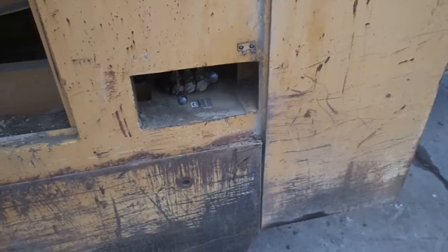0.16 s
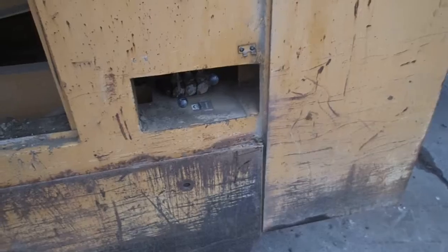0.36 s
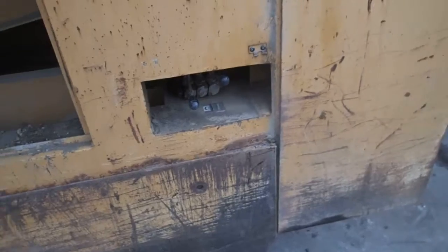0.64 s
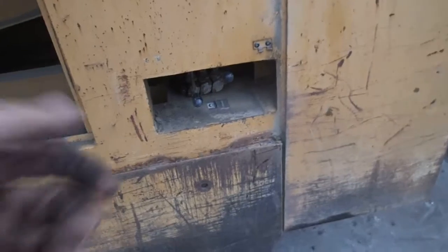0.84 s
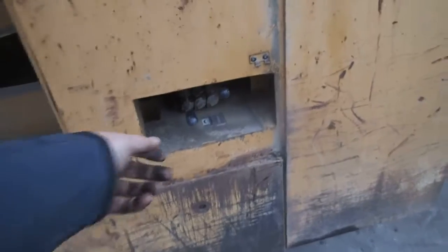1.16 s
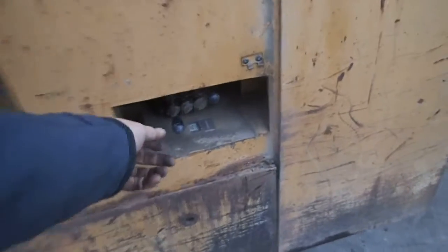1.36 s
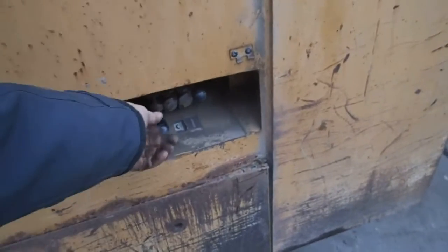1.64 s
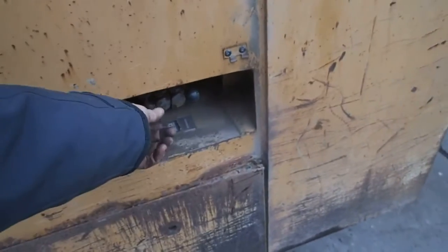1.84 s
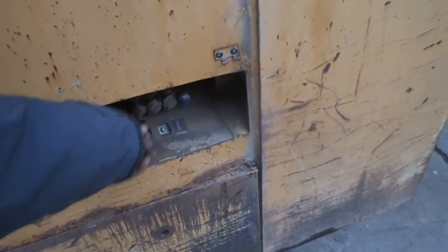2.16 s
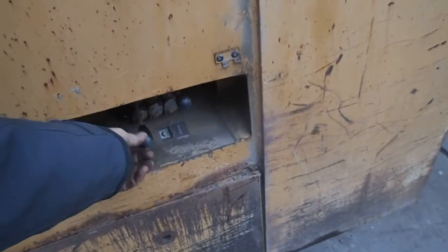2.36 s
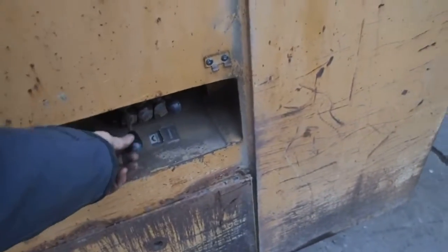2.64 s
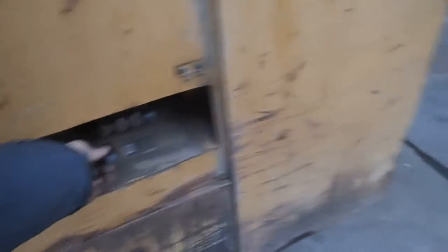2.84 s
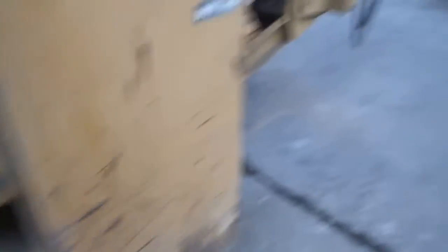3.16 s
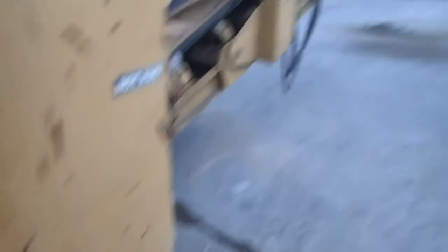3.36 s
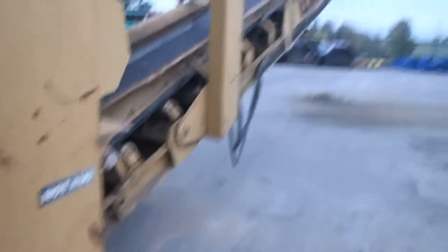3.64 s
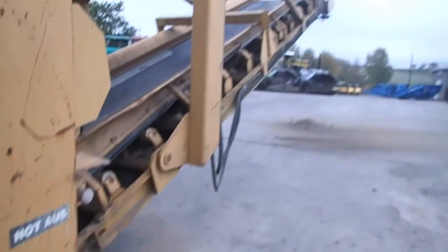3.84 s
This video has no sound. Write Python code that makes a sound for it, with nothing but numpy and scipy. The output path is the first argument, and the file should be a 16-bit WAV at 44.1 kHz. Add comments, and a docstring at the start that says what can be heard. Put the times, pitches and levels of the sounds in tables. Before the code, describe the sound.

A screening machine in an outdoor yard, heard close to its steel side panels. After a short silence and a switch-on pop, engine roar, low drone and rapid pulsing metal rattle run steadily to the end.

```python
"""A shaker shaft turns about 14 times a second in a screening plant, heard beside its steel side panels.
It drives a drone of shaft-rate multiples in the frame and throws loose metal into a bright rattle each turn.
Under it the engine roars as shaped noise and whines on steady tones; panels rumble, throb and clatter.
Random contacts ring the metal; harder knocks, clanks and one squeak stand out at set moments.
The microphone switches on with a pop after a quarter second of silence, right side first."""
import sys
import numpy as np
from scipy import signal
from scipy.fft import rfft, irfft
from scipy.io import wavfile
from scipy.ndimage import uniform_filter1d

SR = 44100
rng = np.random.default_rng(int(sys.argv[2]) if len(sys.argv) > 2 else 0)


def store_wav(level_fs):
    """Save 16-bit WAV to argv[1]."""
    pcm = np.round(np.clip(np.atleast_2d(level_fs), -1, 1) * 32767)
    wavfile.write(sys.argv[1], SR, pcm.T.astype(np.int16))


N = 176400
TIME = np.arange(N) / SR  # seconds
BINS = np.maximum(np.arange(N // 2 + 1) * SR / N, 1)  # Hz

# Microphone: switch-on, steep top cut, and the pop as the right side opens first
START_S, CUTOFF_HZ = 0.265, 15700
POP_LEAD_S, POP_HZ, POP_T60_S = 0.0063, 350, 0.024
POP_DRIVE, POP_TOP = 1.4, 0.79  # push into the flattening, and the height where it flattens
POP_CRACKLE = 0.18  # bright noise added to the pop's sine
# Dips in the microphone's response: pitch_hz, half_width_hz, depth_db
MIC_DIPS = [(1880, 43, 12), (2603, 180, 4.5), (3455, 143, 9), (3950, 110, 5), (4230, 75, 2.5),
            (4803, 47, 14.5)]
# Difference signal against the common signal in the stereo noise: pitch_hz, level_db
STEREO_WIDTH = [(25, -12), (50, -15), (75, -12), (150, -24), (300, -20), (600, -20.5), (1200, -18.5),
                (2100, -24.5), (2700, -26), (3800, -18), (5200, -9), (6500, -8), (8000, -4.5), (10000, -2),
                (13000, 0.5)]
# Balance of the whole machine: pitch_hz, left_minus_right_db
LEFT_RIGHT_BALANCE = [(30, -1), (60, 3), (92, 1.5), (140, 2.5), (210, 2.0), (330, 2.5), (500, 2.0),
                      (770, 1), (1170, 1), (1790, 1), (2740, -1), (4190, 3.5), (6410, -0.5), (9810, 1),
                      (15000, 1.5)]

# Frame drone: multiples of the shaft rate [orders], and the relative level of each [level_db]
SHAFT_HZ, SHAFT_WANDER_S, DRONE_WAVER_DB = 13.82, 0.0004, 2
DRONE_ORDERS = [3, 4, 5, 6, 7, 8, 9, 10, 11, 12, 13, 15, 17, 18, 19, 20, 21, 27, 31, 33, 39]
DRONE_ORDER_LEVELS = [-53.5, -64, -42, -46, -35, -34.5, -54, -35.5, -43, -43.5, -44.5, -37, -44, -36, -35,
                      -39, -42.5, -40, -42.5, -45.5, -51]
# Swell of the whole drone: time_s, relative level_db
DRONE_SWELL = [(.26, -2.5), (1, 2), (2, -1.5), (3, 0), (4, -2.5)]

# Steady engine and fan tones: pitch_hz, level_db
ENGINE_TONES = [(107, -41), (114, -39.5), (124, -39.5), (175.6, -44.5), (296.3, -36.5), (356.7, -48),
                (416.3, -35.5), (538.6, -47), (677, -45.5), (685.4, -40.5), (1720, -57)]
TONES_WAVER_DB, ENGINE_WANDER_S = 2.5, 0.00053
# Engine roar over time: time_s, level_db
ROAR_SWELL = [(.26, -21), (.55, -20.5), (1, -25), (1.6, -21.5), (2.2, -21.5), (2.8, -22), (3.3, -22),
              (4, -23)]
# Colour of the roar: pitch_hz, relative level_db per Hz
ROAR_SPECTRUM = [(20, -22), (35, -17), (55, -12.5), (75, -7), (100, -5), (135, -3), (170, 0), (260, -3.5),
                 (400, -2.5), (520, -6.5), (800, -8.5), (1600, -16), (2600, -24), (4000, -29), (5200, -18),
                 (8000, -38), (11000, -47), (16000, -48)]
WHINE_HZ, WHINE_WIDTH_HZ = 1220, 5.8
# Thin whine over time: time_s, level_db
WHINE_SWELL = [(.26, -50), (1.8, -43), (2.7, -37), (3.3, -35), (3.8, -50)]

RUMBLE_HZ, RUMBLE_WIDTH_HZ, BOOM_HZ, BOOM_WIDTH_HZ = 115, 45, 259, 44
# Low rumble of the housing: time_s, level_db
RUMBLE_SWELL = [(.26, -24), (.5, -37), (.62, -26), (.85, -31.5), (1.2, -39), (1.6, -36), (1.7, -27),
                (2.04, -33), (2.17, -45), (2.27, -30), (2.47, -39), (2.63, -28), (3.1, -38), (3.48, -27),
                (3.62, -44), (3.72, -27), (4, -36)]
# Higher boom of the housing: time_s, level_db
BOOM_SWELL = [(.26, -25.5), (.45, -24), (.7, -35), (1, -37), (1.4, -39), (4, -40)]
# Two close tones that throb beside the side panel: pitch_hz, relative level_db
THROB_TONES = [(331.7, -2), (342.7, 0)]
# The throb fades as the microphone turns away: time_s, level_db
THROB_SWELL = [(.26, -34.5), (.8, -29.5), (1.8, -29), (2.3, -27.5), (2.8, -33), (3.3, -40), (4, -55)]
THROB_WAVER_DB, THROB_WANDER_S = 1, 0.00033

# Each throw: landing against the beat, its scatter, then the rise, hold and fall of the force
LAND_S, LAND_SPREAD_S, RISE_S, HOLD_S, FALL_S = -0.012, 0.0016, 0.011, 0.022, 0.019
THROW_SPREAD_DB = 0.8
HOUSING_T60_S, HOUSING_DB = 0.46, -10.5  # tail behind every rattle and clatter contact

# Contacts a second at unit force, spread of strength, ring time; REST is force between throws
RATTLE_PER_S, RATTLE_SPREAD_DB, RATTLE_T60_S, RATTLE_REST = 900, 2.5, 0.028, 0.059
CLATTER_PER_S, CLATTER_SPREAD_DB, CLATTER_T60_S, CLATTER_REST = 480, 1.4, 0.021, 0.77
# Rattle and ticks over time: time_s, level_db (ticks sit lower by TICK_DB)
RATTLE_SWELL = [(.26, -27), (.55, -25), (1, -27), (1.6, -28), (2.2, -27), (2.8, -27.5), (3.3, -27),
                (4, -26.5)]
# Colour of the rattle and of the pop's crackle: pitch_hz, relative level_db per Hz
RATTLE_SPECTRUM = [(500, -26), (1500, -13), (2300, -7.5), (3000, -13), (3650, -9), (4100, -20.5),
                   (4600, -4.5), (5100, 0.5), (5450, -1.5), (5900, -6), (6800, -11.5), (7900, -9.5),
                   (8800, -17.5), (9700, -23.5), (12000, -29.5), (14000, -27.5), (16000, -43)]
# Panel clatter over time: time_s, level_db
CLATTER_SWELL = [(.26, -25.5), (.55, -26.5), (1, -26), (1.6, -32), (2.2, -31), (2.8, -29.5), (3.3, -26.5),
                 (4, -24.5)]
# Colour of the clatter: pitch_hz, relative level_db per Hz
CLATTER_SPECTRUM = [(100, -10), (250, -17), (450, -3.5), (700, 2), (1100, -1), (1700, 1), (2200, -9),
                    (2800, -14.5), (3700, -15), (5000, -34), (10000, -59)]

# Rings of the smallest loose parts: pitch_hz, relative level_db
TICK_RINGS = [(4640, -6), (5080, 1), (5230, -0.5), (5410, -3), (5680, -5.5), (6150, -3), (6760, -6),
              (7450, -8.5), (8100, -8.5), (9150, -14)]
TICK_PER_S, TICK_SPREAD_DB, TICK_REST, TICK_DB = 45, 2, 0.45, -8  # rate is for each part
TICK_RISE_S, TICK_T60_S = 0.0003, 0.02

# Sharpest knocks of loose metal: start_s, relative level_db
KNOCK_HITS = [(0.365, -11), (0.382, -6), (0.511, -9), (0.53, -14), (0.657, -13), (0.7254, -25),
              (0.871, -13), (1.1004, -9.5), (1.395, -11.5), (1.6718, -8), (1.818, -12), (1.889, -13),
              (2.184, -7.5), (2.3971, -18), (2.5353, -6.5), (2.569, -10), (2.619, -8), (2.703, -12),
              (2.827, -12), (2.905, -9.5), (3.0626, -12), (3.2646, -19), (3.282, -10), (3.333, -7),
              (3.547, -10), (3.781, -12), (3.857, -10), (3.941, -9.5), (3.981, -8)]
# Colour of the knocks: pitch_hz, relative level_db per Hz
KNOCK_SPECTRUM = [(400, -28), (1500, 1), (2300, -2), (3650, -8.5), (4100, -12.5), (5200, 7.5), (6500, -3.5),
                  (8000, -8.5), (10000, -17.5), (15000, -37)]
KNOCK_DB, KNOCK_T60_S = -11.5, 0.073

# Loudest panel clanks: start_s, relative level_db, pitch_hz
CLANK_HITS = [(0.395, -5, 694), (0.556, -9, 990), (0.5866, -6, 1000), (0.624, -6.5, 1070),
              (0.9556, -9, 910), (1.676, -2.5, 766), (2.818, -8, 830), (3.0929, -8, 1300), (3.188, -6, 940),
              (3.205, -9, 1190), (3.249, -5, 692), (3.694, -12, 1010), (3.836, -6.5, 1450),
              (3.867, -11, 1000)]
CLANK_DB, CLANK_T60_S, CLANK_OCTAVES = -14, 0.065, 0.24  # octaves: width of the mode cluster

# One brief squeak of metal
SQUEAK_S, SQUEAK_LENGTH_S, SQUEAK_HZ, SQUEAK_DB = 1.333, 0.012, 1755, -25


def from_db(db):
    """Decibels to gain."""
    return 10 ** (np.asarray(db) / 20)


def rms_one(x):
    """Scale to unit rms."""
    return x / np.sqrt(np.mean(x ** 2) + 1e-20)


def level(rows):
    """Gain over time from time_s, level_db rows."""
    return from_db(np.interp(TIME, *np.transpose(rows)))


def at_hz(points):
    """Read a table along log frequency."""
    hz, value = np.transpose(points)
    return np.interp(np.log(BINS), np.log(hz), value)


def ring_down(age, t60):
    """Exponential decay that loses 60 dB in t60 seconds."""
    return np.exp(-np.log(1000) * age / t60)


def dying(start, t60):
    """Envelope of a blow: silent, then full at once, then decaying."""
    return (TIME >= start) * ring_down(np.clip(TIME - start, 0, 3 * t60), t60)


def drift(rate_hz):
    """Slow chance of rms 1: noise through two equal smoothing poles, one point per 100 samples."""
    pole = np.exp(-200 * np.pi * rate_hz / SR)
    noise = rng.standard_normal(N // 100 + 1002)
    slow = signal.lfilter([1], [1, -2 * pole, pole ** 2], noise)[1000:]  # drop the filter's settling
    return np.interp(np.arange(N) / 100, np.arange(len(slow)), rms_one(slow))


def colour(pair, spectrum):
    """Shape two unrelated signals and blend them into left and right; rms 1."""
    mid, side = rfft(pair) * from_db(at_hz(spectrum))
    width = from_db(at_hz(STEREO_WIDTH))
    left_right = [mid + width * side, mid - width * side]
    return rms_one(irfft(left_right / np.hypot(1, width), N))


def partials(rows, waver_db, wander_s):
    """Sines whose speed wanders together while each wavers in level."""
    clock = TIME + wander_s * drift(0.64)
    out = 0
    for hz, db in rows:
        gain = np.sqrt(2) * from_db(db + waver_db * drift(1.4))
        out = out + gain * np.sin(2 * np.pi * (hz * clock + rng.random()))
    return out


def resonance(hz, width_hz):
    """A resonance shaken at random, its slow swings of level evened out; rms near 1."""
    response = 1 / (1 + (2 * (BINS - hz) / width_hz) ** 4)
    ring = irfft(rfft(rng.standard_normal(N)) * response, N)
    return ring / np.sqrt(uniform_filter1d(ring ** 2, size=SR // 10) + 1e-12)


def random_clicks(force, per_s, spread_db, cap):
    """Contacts at random moments, of either sign, scaled by the force."""
    sizes = from_db(spread_db * np.minimum(rng.exponential(1, N), cap)) * rng.choice([-1, 1], N)
    return sizes * force * (rng.random(N) < per_s / SR)


def contacts(force, per_s, spread_db, t60, count):
    """Contacts dealt to several steel parts, each with a short dense ring and a tail in the housing."""
    clicks = random_clicks(force, per_s, spread_db, cap=4)
    part = rng.integers(0, count, N)
    age = TIME[:SR // 6]  # the tail stops after a sixth of a second
    decay = ring_down(age, t60) + from_db(HOUSING_DB) * ring_down(age, HOUSING_T60_S)
    out = 0
    for k in range(count):
        ring = decay * rng.standard_normal((2, len(age)))
        out = out + signal.fftconvolve([clicks * (part == k)], ring, axes=1)[:, :N]
    return out


def throws():
    """Force on the loose parts: they land a little early or late each turn; it rises, holds and falls."""
    chance = rng.standard_normal((int(N / SR * SHAFT_HZ) + 2, 2))
    power = np.zeros(N)
    for turn, (late, hard) in enumerate(chance):
        lands = turn / SHAFT_HZ + LAND_S + LAND_SPREAD_S * late
        near = slice(max(int(lands * SR), 0), max(int((lands + 2 / SHAFT_HZ) * SR), 0))
        age = TIME[near] - lands
        rise = np.clip(age / RISE_S, 0, 1)
        fall = np.exp(-np.maximum(age - RISE_S - HOLD_S, 0) / FALL_S)
        power[near] += (from_db(THROW_SPREAD_DB * hard) * rise * fall) ** 2
    return np.sqrt(power)


def pop(opens):
    """The switch-on pop: a dying sine with bright crackle, flattened at its peaks."""
    crackle = colour(rng.standard_normal((2, N)), RATTLE_SPECTRUM)[1]
    thump = np.sin(2 * np.pi * POP_HZ * (TIME - opens)) + POP_CRACKLE * crackle
    return -POP_TOP * np.tanh(POP_DRIVE * dying(opens, POP_T60_S) * thump)


def shaker():
    """The frame drones on multiples of the shaft rate."""
    rows = [(order * SHAFT_HZ, db) for order, db in zip(DRONE_ORDERS, DRONE_ORDER_LEVELS)]
    return level(DRONE_SWELL) * partials(rows, DRONE_WAVER_DB, SHAFT_WANDER_S)


def engine():
    """A broad roar with steady tones standing out of it, and a whine that swells late."""
    roar = level(ROAR_SWELL) * colour(rng.standard_normal((2, N)), ROAR_SPECTRUM)
    whine = level(WHINE_SWELL) * resonance(WHINE_HZ, WHINE_WIDTH_HZ)
    return roar + whine + partials(ENGINE_TONES, TONES_WAVER_DB, ENGINE_WANDER_S)


def panels():
    """The housing rumbles in lumps, booms at first, and throbs on two close tones beside the side panel."""
    rumble = level(RUMBLE_SWELL) * resonance(RUMBLE_HZ, RUMBLE_WIDTH_HZ)
    boom = level(BOOM_SWELL) * resonance(BOOM_HZ, BOOM_WIDTH_HZ)
    throb = level(THROB_SWELL) * partials(THROB_TONES, THROB_WAVER_DB, THROB_WANDER_S)
    return rumble + boom + throb


def rattle(force):
    """Small loose metal chatters in a burst on each throw."""
    hits = contacts(force + RATTLE_REST, RATTLE_PER_S, RATTLE_SPREAD_DB, RATTLE_T60_S, count=8)
    return level(RATTLE_SWELL) * colour(hits, RATTLE_SPECTRUM)


def ticks(force):
    """The smallest parts tick one by one, each with its own short ring."""
    age = TIME[:SR // 10]
    envelope = ring_down(age, TICK_T60_S) * np.tanh(age / TICK_RISE_S) ** 2
    out = 0
    for hz, db in TICK_RINGS:
        clicks = random_clicks(force + TICK_REST, TICK_PER_S, TICK_SPREAD_DB, cap=3)
        phase = rng.random((2, 1)) / 4  # in turns, one for each side
        ring = envelope * np.sin(2 * np.pi * (hz * age + phase))
        out = out + from_db(db) * signal.fftconvolve([clicks], ring, axes=1)[:, :N]
    return from_db(TICK_DB) * level(RATTLE_SWELL) * rms_one(out)


def clatter(force):
    """Heavier panels and the deck knock all the time, a little harder on each throw."""
    hits = contacts(force + CLATTER_REST, CLATTER_PER_S, CLATTER_SPREAD_DB, CLATTER_T60_S, count=8)
    return level(CLATTER_SWELL) * colour(hits, CLATTER_SPECTRUM)


def knocks():
    """Harder knocks of loose metal: dying bursts of noise, fuller in the middle than the chatter."""
    blows = sum(from_db(db + KNOCK_DB) * dying(start, KNOCK_T60_S) for start, db in KNOCK_HITS)
    return blows * colour(rng.standard_normal((2, N)), KNOCK_SPECTRUM)


def clanks():
    """Single harder blows set a cluster of panel modes ringing, made as a dying band of noise."""
    out = 0
    for start, db, hz in CLANK_HITS:
        edges = hz * 2 ** (CLANK_OCTAVES * np.array([-0.5, 0.5]))
        band = signal.butter(2, edges, "band", fs=SR, output="sos")
        modes = rms_one(signal.sosfilt(band, rng.standard_normal(N)))
        out = out + from_db(db + CLANK_DB) * dying(start, CLANK_T60_S) * modes
    return out


def squeak():
    """Metal rubs briefly at an unsteady pitch: a sine with a drifting phase."""
    swell = np.exp(-((TIME - SQUEAK_S) / SQUEAK_LENGTH_S) ** 2)
    tone = np.sqrt(2) * np.sin(2 * np.pi * SQUEAK_HZ * TIME + drift(31))
    return from_db(SQUEAK_DB) * swell * tone


def scene():
    """The whole machine, slightly to the left."""
    force = throws()
    machine = shaker() + engine() + panels()
    machine = machine + rattle(force) + ticks(force) + clatter(force)
    machine = machine + knocks() + clanks() + squeak()
    # each side takes half of the left-right difference
    sides = from_db(at_hz(LEFT_RIGHT_BALANCE) * [[0.5], [-0.5]])
    return irfft(rfft(machine) * sides, N)


def record(dry):
    """Microphone dips, the switch-on with its pop on the right, and a steep top cut."""
    dips_db = sum(depth / (1 + ((BINS - hz) / width) ** 2) for hz, width, depth in MIC_DIPS)
    right_opens = START_S - POP_LEAD_S
    is_open = TIME >= np.array([[START_S], [right_opens]])
    heard = irfft(rfft(dry) * from_db(-dips_db), N) * is_open
    heard[1] += pop(right_opens)
    top_cut = signal.ellip(12, 0.1, 90, CUTOFF_HZ, fs=SR, output="sos")
    return signal.sosfilt(top_cut, heard)


dry = scene()
out = record(dry)
store_wav(out)
```